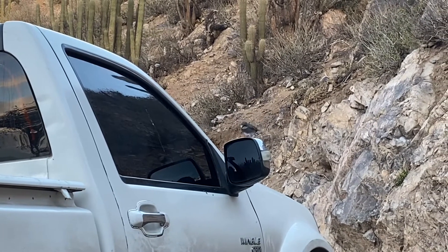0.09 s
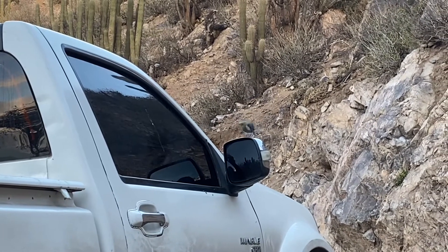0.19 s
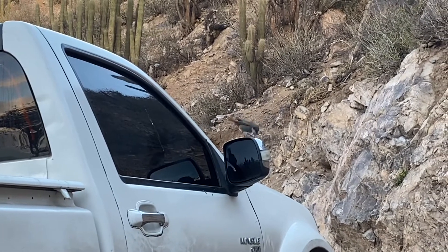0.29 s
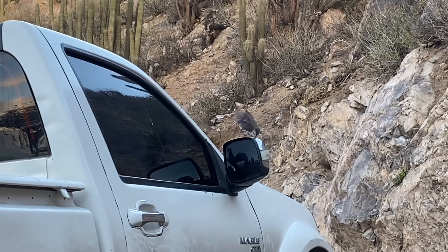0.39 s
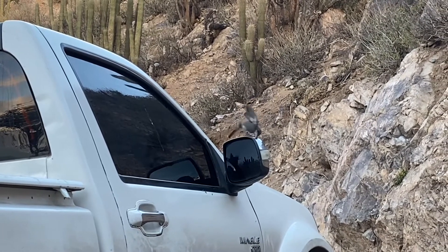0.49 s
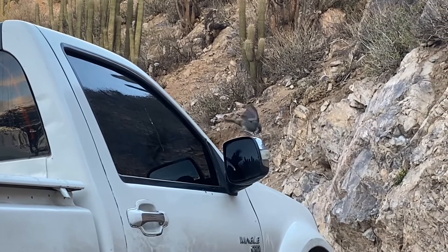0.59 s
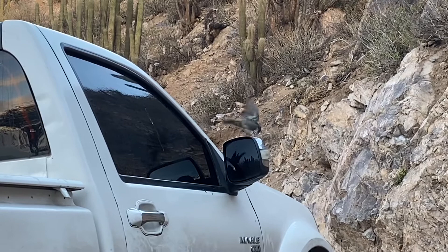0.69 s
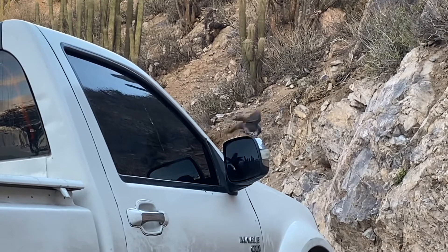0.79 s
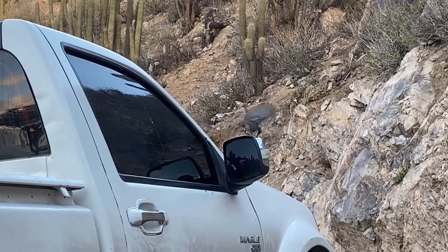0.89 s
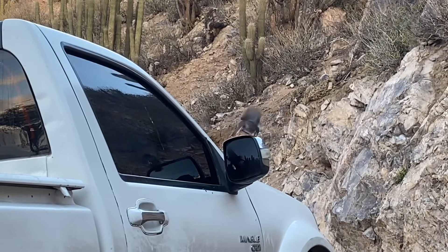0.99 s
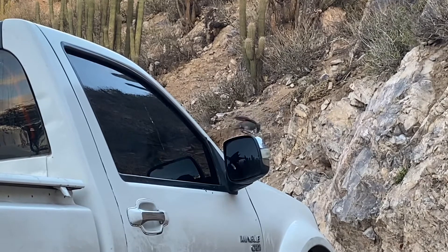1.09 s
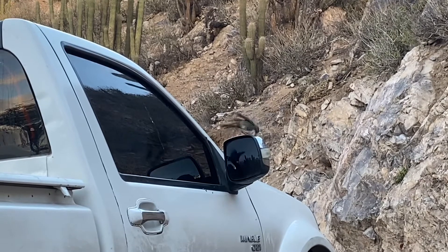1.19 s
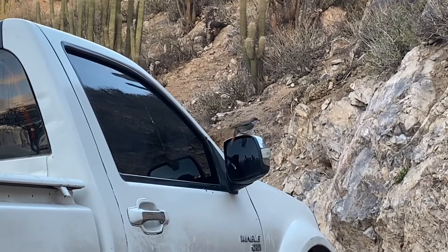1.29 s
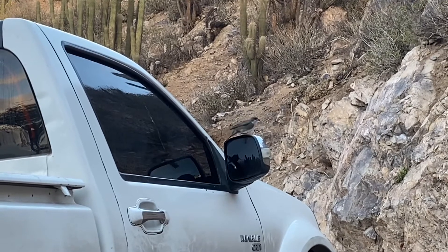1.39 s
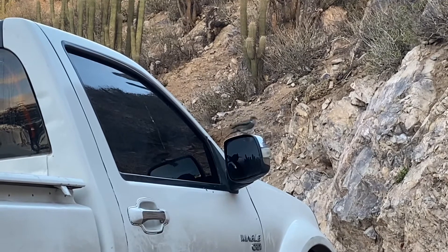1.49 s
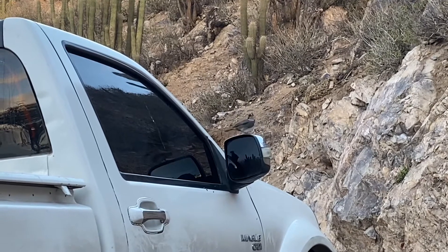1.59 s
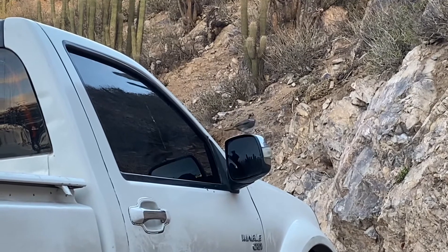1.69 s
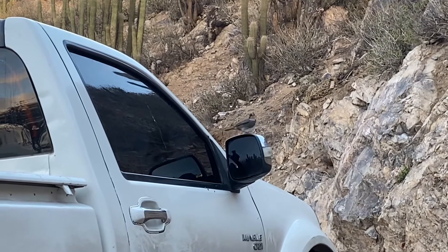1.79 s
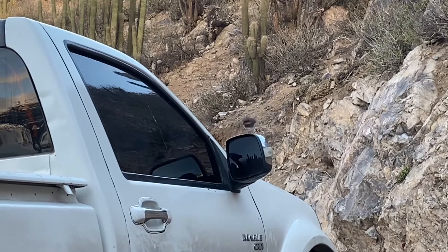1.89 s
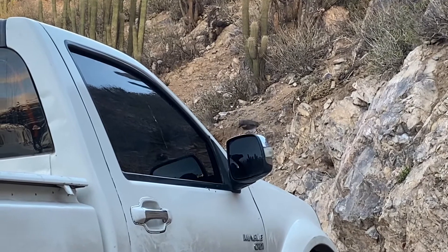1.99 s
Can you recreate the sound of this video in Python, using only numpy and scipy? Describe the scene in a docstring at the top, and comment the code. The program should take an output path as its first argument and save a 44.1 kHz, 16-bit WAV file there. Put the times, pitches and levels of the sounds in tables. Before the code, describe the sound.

Sharp glassy beak taps with hollow knocks, eight in a row on a vehicle window outdoors

```python
"""A small bird pecks a parked truck's side window eight times, about eight pecks a second, outdoors.
Each peck is a glassy tick (shaped noise and decaying window modes) and a hollow knock (swelling low sines),
with a softer rebound 10 to 21 ms later. Shortly after the last peck comes one light bump of the pane.
Claws and feathers make light ticks and scuffs (grainy noise bursts) between the pecks and after them.
Behind lie a diffuse wash from truck and rocks, a low rumble and a hum of three wavering tones."""
import sys
import numpy as np
from scipy import signal
from scipy.fft import rfft, irfft
from scipy.io import wavfile
from scipy.ndimage import uniform_filter1d

SR = 44100
rng = np.random.default_rng(int(sys.argv[2]) if len(sys.argv) > 2 else 0)


def transcribe(u):
    """Save the signal u as a 16-bit wav file named by the first command-line argument.

    u: samples, shape (n,) or (channels, n), limited to [-1, 1]; the rate is SR.
    q: integer samples, one column per channel.
    """
    v = np.clip(np.atleast_2d(u).T, -1, 1)
    q = np.round(v * 32767).astype(np.int16)
    wavfile.write(sys.argv[1], SR, q)


N = 88200  # two seconds

HIT_S = 0.4  # length computed for each touch of the window
GLASS_RISE_S = 0.001394
KNOCK_PEAK_S = 0.0083


def amp(db):
    """Decibels to gain."""
    return 10 ** (np.asarray(db) / 20)


def unit(x):
    """Scales to rms 1."""
    return x / np.sqrt(np.mean(x ** 2) + 1e-20)


def read(points, hz):
    """Reads a table on a log-frequency axis."""
    f, value = np.transpose(points)
    return np.interp(np.log(hz + 1), np.log(f + 1), value)


def add(mix, start_s, sound):
    """Adds a sound at a time, cut off at the end of the mix."""
    part = mix[max(round(start_s * SR), 0):][:len(sound)]
    part += sound[:len(part)]


def sine(hz, t):
    """Steady tone that starts at zero phase."""
    return np.sin(2 * np.pi * hz * t)


def rise(t, rise_s):
    """Straight rise from 0 to 1."""
    return np.minimum(t / rise_s, 1)


def fade(t, t60_s):
    """Exponential decay, 60 dB in t60_s."""
    return np.exp(-np.log(1000) * np.maximum(t, 0) / t60_s)


def tilted(hz, tilt_db):
    """Gain of a slope in dB per octave around 3.5 kHz, level below 1 kHz."""
    return amp(tilt_db * np.log2(np.maximum(hz, 1000) / 3500))


def noise(n, colour, tilt_db=0):
    """Noise of rms 1 with a given colour."""
    hz = np.fft.rfftfreq(n, 1 / SR)
    spectrum = rfft(rng.standard_normal(n)) * amp(read(colour, hz))
    return unit(irfft(spectrum * tilted(hz, tilt_db), n))


def slow(rate_hz):
    """Slow random wander of rms 1."""
    hz = np.fft.rfftfreq(N, 1 / SR)
    return unit(irfft(rfft(rng.standard_normal(N)) * np.exp(-(hz / rate_hz) ** 2), N))


def rumble():
    """Low outdoor air: noise whose left-right likeness depends on frequency."""
    # colour of the outdoor rumble: pitch_hz, relative level_db
    air_colour = [(20, -33.5), (38, -21), (52, 2), (68, -3), (98, -3.5), (140, -9.5), (200, -16.5),
                  (360, -19.5), (900, -26.5), (1600, -33), (2000, -37.5), (2500, -52), (3500, -57.5),
                  (7000, -59.5), (12000, -60.5), (15000, -74.5)]
    # left-right likeness of the rumble: pitch_hz, shared share of power (0 to 1)
    air_likeness = [(40, 0.36), (200, 0.8), (1500, 0.51), (4000, 1), (15000, 0.17)]
    same = read(air_likeness, np.fft.rfftfreq(N, 1 / SR))
    shared, left, right = (rfft(noise(N, air_colour)) for _ in range(3))
    air = irfft(np.sqrt(same) * shared + np.sqrt(1 - same) * np.array([left, right]), N)
    return amp(-52.5) * air


def hum():
    """Low tones, like a distant engine, that waver in level and drift in pitch; the lowest also swells."""
    # tones of the hum: pitch_hz, level_db (rms, ahead of the swell)
    hum_tones = [(76, -57), (153, -65.5), (208, -73.5)]
    # swell of the lowest tone: time_s, gain_db
    bass_swell = [(0, -3), (.38, 1.5), (.55, -3), (0.948, 2), (1.091, 5), (1.26, 8.5), (1.45, -4.5),
                  (2, -1)]
    waver, drift_hz = 0.5, 1.8  # rms, as a share of the level and in Hz
    tones = []
    for pitch_hz, level_db in hum_tones:
        level = 1 + waver * slow(rate_hz=6.7)
        phase = 2 * np.pi * np.cumsum(pitch_hz + drift_hz * slow(rate_hz=6.2)) / SR
        tones.append(amp(level_db) * unit(level * np.sin(phase)))
    swell = amp(np.interp(np.arange(N) / SR, *np.transpose(bass_swell)))
    return swell * tones[0] + sum(tones[1:])


def scatter(x):
    """A faint diffuse wash from truck body and rocky slope follows the treble energy, alike on both sides."""
    # colour of the scattered sound: pitch_hz, relative level_db
    wash_colour = [(200, -23), (600, -9), (1500, -0.5), (3000, 2), (4500, -5.5), (7500, -13),
                   (11000, -11.5), (15000, -21.5)]
    t = np.arange(SR // 2) / SR
    treble = signal.sosfilt(signal.butter(4, 1000, "high", fs=SR, output="sos"), x)
    energy_decay = (rise(t, rise_s=0.0041) * fade(t, t60_s=0.32)) ** 2
    energy = signal.fftconvolve(treble ** 2, energy_decay / energy_decay.sum())[:N]
    level = np.sqrt(abs(energy))
    return amp(-19.5) * level * noise(N, wash_colour)


def glass_ring(t):
    """The window's modes after one light blow; bending waves bring the high ones first."""
    # ringing of the glass: pitch_hz, relative level_db, t60_s
    glass_modes = [(929, -19, .06), (1124, -13, 0.0614), (1345, -8, 0.091), (1601.4, -5.5, 0.069),
                   (1878, -12.5, 0.086), (2140, 0, 0.044), (2220, -8, 0.017), (2567, -7.5, 0.047),
                   (2643, -7, .07), (2848, -3.5, 0.047), (3040, -15.5, 0.061), (3370, -11.5, 0.043),
                   (3520, -2.5, 0.039), (3670, -10, 0.018), (3920, -6, 0.021), (4150, -1, 0.022),
                   (4266, -5.5, 0.039), (4520, -11.5, .04), (5500, -22, 0.069), (5800, -13, .04),
                   (6320, -11.5, 0.035), (6540, -4.5, 0.028), (6940, -10, 0.063), (7400, -10, .04)]
    travel_s = 0.004  # at 1 kHz, shorter in the treble
    varies_db = 1.5  # each blow lands a little differently and weights the modes anew
    out = np.zeros(len(t))
    for k, (hz, level_db, t60_s) in enumerate(glass_modes):
        age = np.maximum(t - travel_s * 1000 / hz, 0)
        swing = (-1) ** k * sine(hz, age) * rise(age, GLASS_RISE_S)  # neighbours swing in opposite senses
        out += amp(level_db + varies_db * rng.standard_normal()) * fade(age, t60_s) * swing
    return amp(-1.5) * out / 2


def scuffs():
    """Short, grainy touches that stir the glass a little: claws and feathers, and one tick of a rebound."""
    # claw ticks and scuffs; the one at 0.89 s is a bright tick of the sixth peck's rebound:
    # start_s, level_db, tilt_db per octave, rise_s, glass ringing_db (relative)
    touches = [(.150, -66.5, -8.5, .008, -10.5), (.429, -63.5, 0.5, 0.0025, 2),
               (0.444, -54.5, 0, 0.0055, 3.5), (0.473, -49, -3.5, 0.0066, -14),
               (.553, -43, 19, 0.0016, -24), (0.563, -58, -5, 0.0023, -2.5), (0.677, -59, 11, .002, -17.5),
               (0.724, -57, -3.5, 0.0047, -1.5), (0.772, -47.5, 3, 0.0014, -10),
               (0.828, -61.5, 9, 0.0016, 7), (.839, -58.5, -1, 0.0017, 0), (0.89, -62, 8, 0.0018, -15),
               (.945, -64, -0.5, 0.0044, -5), (0.98, -62, 4, 0.0067, -14), (1.068, -61.5, -5, 0.0059, 3),
               (1.076, -44, 3, 0.0022, -9), (1.132, -58, -2, .004, -7.5), (1.193, -50, 0, 0.001, -17),
               (1.276, -61.5, -4, 0.0058, -5.5), (1.893, -57.5, 2.5, 0.0031, -11),
               (1.903, -50, -5.5, 0.00067, -14)]
    # colour of the brushing: pitch_hz, relative level_db
    brush_colour = [(300, -7), (1300, -4), (2400, 3.5), (4000, -9.5), (7500, -6), (9200, -1.5),
                    (10800, -6.5), (12300, -6.5), (15500, -11)]
    out, t = np.zeros(N), np.arange(round(HIT_S * SR)) / SR
    for start_s, level_db, tilt_db, rise_s, ring_db in touches:
        flicker_db = unit(uniform_filter1d(rng.standard_normal(len(t)), size=40))  # 1 dB rms
        envelope = unit(amp(flicker_db)) * rise(t, rise_s) * fade(t - rise_s, t60_s=0.053)
        brush = envelope * noise(len(t), brush_colour, tilt_db)
        add(out, start_s, amp(level_db) * (brush + amp(ring_db) * glass_ring(t)))
    return out


def knock(t, hz):
    """The pane's hollow low note swells and dies quickly; a short clack of a second damped mode starts it."""
    swell, early = t / KNOCK_PEAK_S, t / 0.0036  # times relative to the peak of each mode
    clack = amp(-17.5) * early * np.exp(1 - early) * sine(627, t)
    sharpness = 2.6
    return (swell * np.exp(1 - swell)) ** sharpness * sine(hz, t) + clack


def pecks():
    """The beak hits nearly the same spot each time: crack, glass modes, the pane's knock, then a rebound."""
    # pecks, levels relative: start_s, tick_db, tilt_db per octave, knock_db, knock_hz,
    # rebound_after_s, rebound_db, clink_db
    blows = [(0.223, -33, -3, -26.5, 484, 0.021, -5.5, -33.5),
             (0.3589, -34, -3, -30, 471, 0.019, -6.5, -48), (0.483, -36, -1.5, -31, 491, .0105, -4, -56.5),
             (0.616, -34.5, -1, -31.5, 490, 0.018, -4.5, -60.5),
             (.7436, -35.5, -1, -31.5, 479, .0102, -4.5, -55),
             (0.8695, -35.5, -1.5, -34.5, 493, .0209, -2, -64.5),
             (0.996, -34.5, -1, -31, 488, .0191, -4, -57.5),
             (1.1470, -33.5, -2, -31.5, 486.3, 0.017, -5.5, -50)]
    # colour of the crack of beak on glass: pitch_hz, relative level_db
    crack_colour = [(200, -2), (330, -6.5), (700, -2), (1150, -6.5), (2200, 2.5), (4000, 4), (4700, -5.5),
                    (7500, -7), (8400, -4), (10500, -12.5), (12300, -10), (15500, -16)]
    # light bump of the pane after the last peck: start_s, knock_db, knock_hz, clink_db
    faint_bump = (1.278, -46.5, 481, -47)
    varies = 0.53  # amplitude of the crack's noise that is new at each peck
    rebound_tick_db, knock_delay_s = -10, 0.0014
    out, t = np.zeros(N), np.arange(round(HIT_S * SR)) / SR
    hz = np.fft.rfftfreq(len(t), 1 / SR)
    spot = noise(len(t), crack_colour)  # common to all pecks
    snap = amp(-3.5) * rise(t, rise_s=0.0013) * fade(t - 0.0031, t60_s=0.059)  # fades from 3.1 ms
    ring = amp(-16) * rise(t, 2 * KNOCK_PEAK_S) * fade(t, t60_s=0.43) * sine(493.3, t)
    # a glass mode that depends on where the beak lands
    clink = rise(t, GLASS_RISE_S) * fade(t, t60_s=0.078) * sine(2290, t)
    for start_s, tick_db, tilt_db, knock_db, knock_hz, gap_s, rebound_db, clink_db in blows:
        crack = snap * (np.sqrt(1 - varies ** 2) * spot + varies * noise(len(t), crack_colour))
        tick = amp(tick_db) * irfft(rfft(crack + glass_ring(t)) * tilted(hz, tilt_db), len(t))
        note = knock(t, knock_hz)
        add(out, start_s, tick + amp(clink_db) * clink)
        add(out, start_s + knock_delay_s, -amp(knock_db) * (note + ring))
        add(out, start_s + gap_s, amp(rebound_db + rebound_tick_db) * tick)
        add(out, start_s + gap_s + knock_delay_s, -amp(knock_db + rebound_db) * note)
    start_s, knock_db, knock_hz, clink_db = faint_bump
    add(out, start_s, amp(knock_db) * knock(t, knock_hz) + amp(clink_db) * clink)
    return out


def scene():
    """The bird at the window, shifted in phase between the sides, its faint scatter and the background."""
    # phase between the sides: pitch_hz, left_leads_radians
    left_lead = [(20, 0.5), (780, 0.45), (1120, 1.24), (1460, .5), (2500, 0.25), (7410, 0), (8790, -3),
                 (9560, -2), (10500, -8.5), (11500, -4), (12700, -11), (13700, -10), (14700, -7.5),
                 (16100, -10)]
    bird = pecks() + scuffs()
    lag = np.exp(-1j * read(left_lead, np.fft.rfftfreq(N, 1 / SR)))
    sides = np.array([bird, irfft(rfft(bird) * lag, N)])
    return sides + scatter(bird) + rumble() + hum()


def record(dry):
    """The left microphone hears more of the low range, both ports notch the treble; then the band limit."""
    # level between the microphones: pitch_hz, left_over_right_db
    left_lean = [(60, 2.5), (110, 2), (200, 10), (480, 5), (750, 5), (1300, 6.5), (2400, -0.5),
                 (4400, -0.5), (15000, 0)]
    # colour of the microphone ports: pitch_hz, gain_db
    port_colour = [(7600, 0), (8400, -5), (9200, -12), (10200, -2.5), (12400, 0.5), (13200, -9.5),
                   (14200, 0)]
    hz = np.fft.rfftfreq(N, 1 / SR)
    lean_db = read(left_lean, hz) / 2  # half up on the left, half down on the right
    heard = irfft(rfft(dry) * amp([lean_db, -lean_db]) * amp(read(port_colour, hz)), N)
    low_pass = signal.firwin(511, 16200, window=("kaiser", 9), fs=SR)
    return signal.oaconvolve(heard, low_pass[None], "same")


dry = scene()
out = record(dry)
transcribe(out)
```